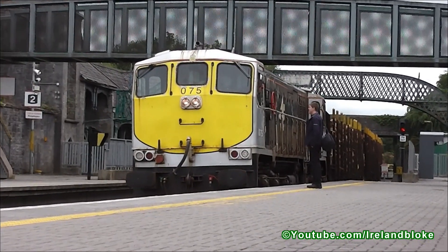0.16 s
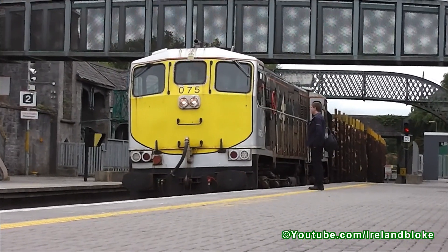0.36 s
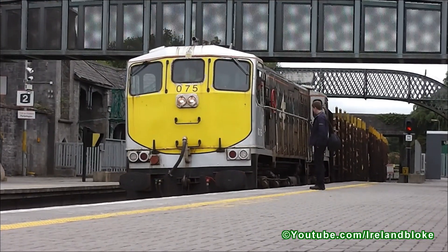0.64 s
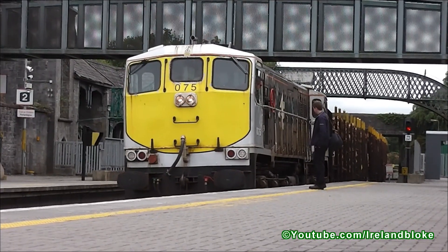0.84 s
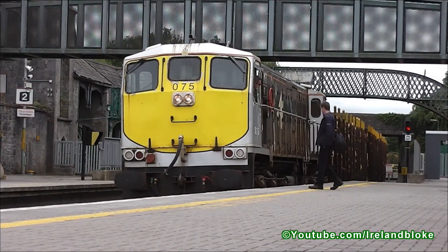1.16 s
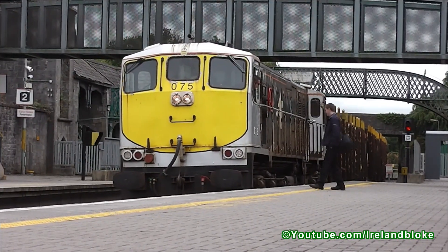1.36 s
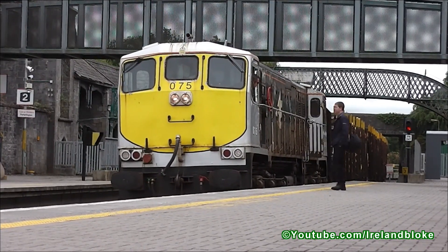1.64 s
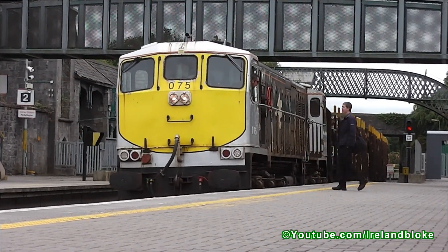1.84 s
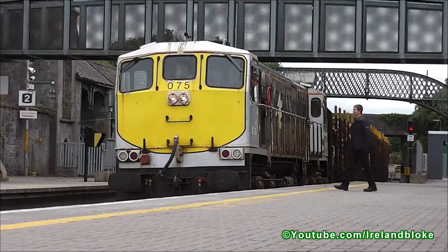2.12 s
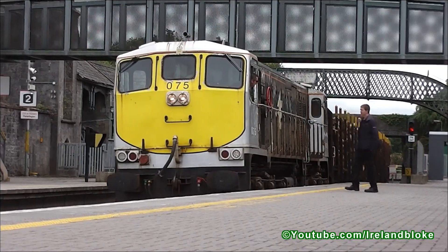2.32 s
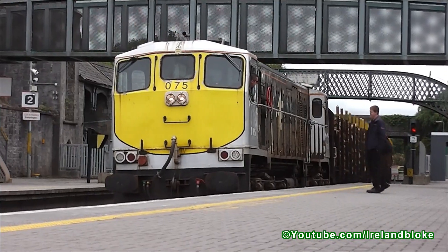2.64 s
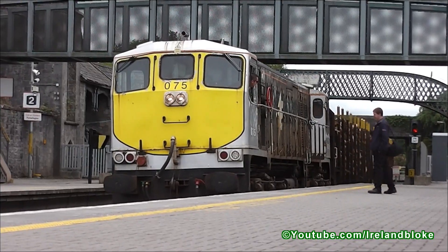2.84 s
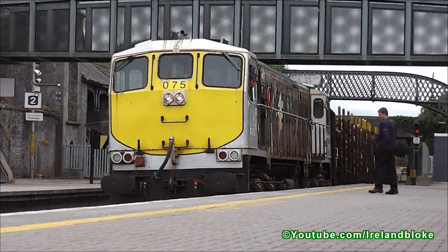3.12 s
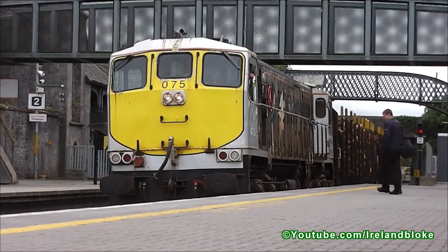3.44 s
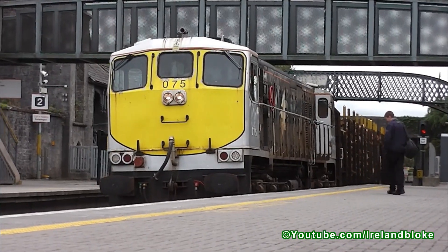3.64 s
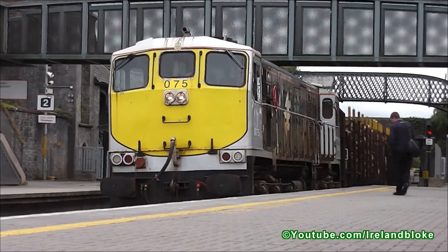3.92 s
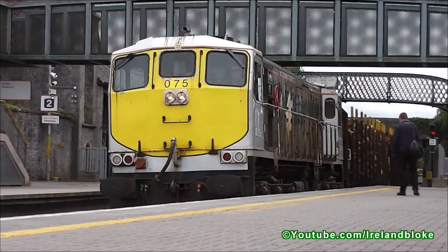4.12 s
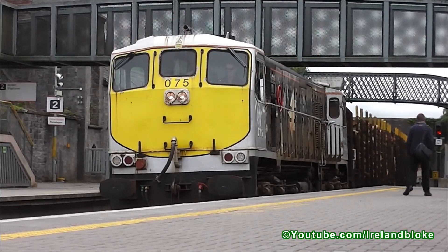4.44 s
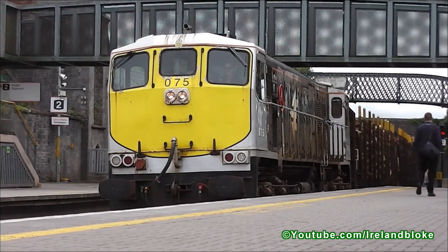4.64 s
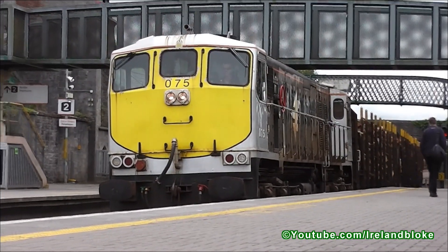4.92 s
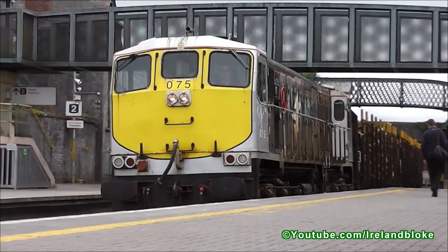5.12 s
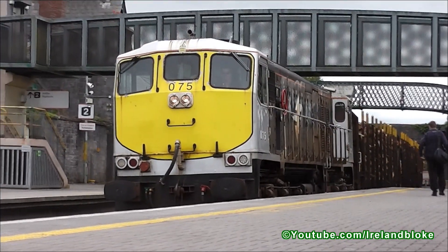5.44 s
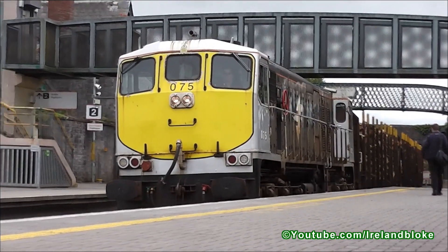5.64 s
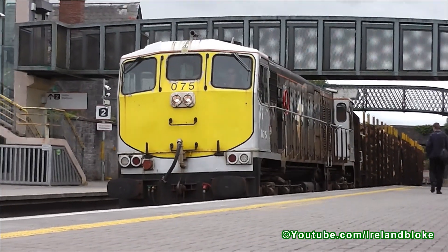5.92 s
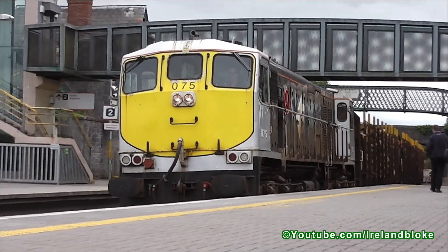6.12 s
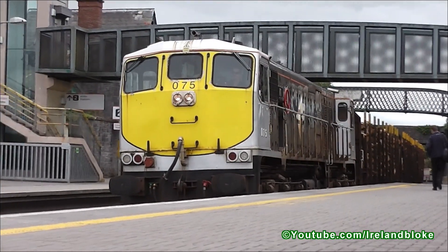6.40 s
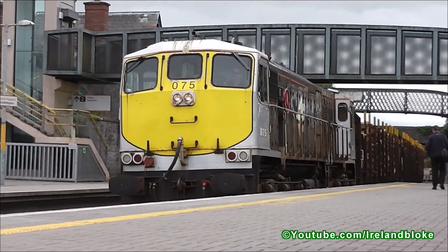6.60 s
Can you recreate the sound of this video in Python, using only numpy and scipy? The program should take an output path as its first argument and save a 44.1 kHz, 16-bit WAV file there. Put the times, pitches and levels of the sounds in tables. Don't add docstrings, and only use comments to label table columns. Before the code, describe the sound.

A big diesel locomotive throbs loudly in uneven deep beats close by, with gear whine, airy fan hiss and a faint late wheel squeal.

```python
import sys
import numpy as np
from scipy import signal
from scipy.fft import rfft, irfft, next_fast_len
from scipy.io import wavfile
from scipy.ndimage import uniform_filter1d, map_coordinates

SR = 44100
rng = np.random.default_rng(int(sys.argv[2]) if len(sys.argv) > 2 else 0)


def voltage_ratio(level):
    return 10 ** (np.asarray(level, float) / 20)


def digitize_waveform(pressure):
    field = np.atleast_2d(pressure).T
    bounded = np.clip(field, -1, 1)
    quanta = np.round(bounded * 32767).astype(np.int16)
    wavfile.write(sys.argv[1], SR, quanta)


N = 298557

SHAFT_HZ = 9.535
GEAR_HZ, PUMP_HZ = 753.3, 1076.5
OVERTONES_FADE_DB_PER_S = 0.9
TURBO_DB = -4
HOLLOW_FOLLOWS = 1
NULL_S, NULL_ORDER, RETURN_DB, RETURN_RAD = 6.03, 9, 7, -1.3
DRIVE_DB, CEILING_DB, RELEASE_DB_PER_S, ATTACK_S = 2.5, -2.03, 49, 0.002
TALL_SHARE, TICK_DB = 0.83, -29.5

# [crank angle/deg, level/dB]
FIRINGS = [(-4.8, 3.0), (26.5, 7.0), (50.0, 1.0), (113.7, 3.4), (124.0, -14.2), (140.7, -8.6),
           (188.1, -7.1), (224.4, -6.7), (232.0, 0.5), (282.7, 6.5), (303.2, 10.6), (320.9, 4.7)]
# [t/s, delay/ms]
BEAT_DELAY = [(0, 0.52), (1.4, 1.45), (2.8, 0.23), (4.2, -0.34), (5.4, -0.02), (6.2, -0.97), (6.77, -1.92)]
# [f/Hz, level/dB]
STACK_RESPONSE = [(25, -45.5), (42, -59.4), (57, -30.0), (75, -18.6), (90, -32.1), (105, -31.0),
                  (125, -32.7), (140, -46.5), (160, -55.6), (190, -75.9), (225, -35.5), (255, -41.1),
                  (285, -50.6), (320, -39.7)]
# [order, level/dB, echo share, spacing of cancellings t/s, one cancelling t/s]
WALL_ECHOES = [(5, -2.4, 0.64, 5.2, 3.12), (6, -4.8, 0.92, 8.3, -0.99), (7, -2.0, 0.45, 3.3, -0.55),
               (8, -6.9, 1.2, 9.3, -0.67), (9, -6.2, 1.2, 8.6, -1.24), (10, -3.9, 0.44, 2.5, 0.85),
               (11, -1.1, 0.58, 8.4, 1.04), (12, 1.7, 0.42, 16.0, 2.95), (13, -0.9, 0.19, 6.9, 1.85),
               (14, -0.7, 0.18, 16.0, 4.8), (15, 0.5, 0.25, 8.8, 0.85)]
# [f/Hz, level/dB]
CASING_RESPONSE = [(150, -52), (175, -34), (200, -54), (250, -62.5), (290, -38.5), (320, -72), (345, -49),
                   (400, -33), (460, -36), (510, -42.5), (555, -35), (640, -99)]
# [t/s, cam gear level/dB, pump gear level/dB]
MESH_LEVELS = [(0, -52, -36), (.4, -18.5, -32), (1, -35, -32), (1.35, -24.5, -30.5), (1.7, -29, -34.5),
               (2.1, -26, -31.5), (2.6, -25, -37), (3.1, -29, -36), (3.55, -27, -41), (3.9, -23, -31),
               (4.2, -21.5, -29.5), (4.6, -20, -36), (5, -20.5, -29.5), (5.5, -23, -35.5), (6, -24, -31),
               (6.77, -23, -31)]
# [multiple, level/dB]
CAM_GEAR_MULTIPLES = [(.5, -36), (1.5, -40), (2.0, -40), (2.5, -50), (5.0, -56)]
# [t/s, lower ring level/dB, upper ring level/dB]
BRAKE_RINGS = [(0, -64, -62), (.5, -62, -48), (1.05, -60, -57), (1.4, -68, -47.5), (2.3, -67, -52),
               (2.9, -64, -58), (3.2, -57, -52), (3.8, -53, -54), (4.5, -54, -63), (4.9, -52, -52),
               (5.3, -51, -57), (6.77, -52, -60)]
# [t/s, peak level/dB, length t/s]
WHEEL_SLIPS = [(5.983, -38, .035), (6.03, -41, 0.029), (6.054, -32, 0.062), (6.102, -34, 0.043),
               (6.14, -32, 0.029), (6.18, -34, .033), (6.226, -34, 0.026), (6.27, -43, .035),
               (6.297, -33, .04), (6.363, -37, .035), (6.4, -31, 0.033), (6.432, -35, 0.028),
               (6.464, -37, 0.026), (6.492, -34, 0.02), (6.527, -43, 0.025), (6.569, -48, .04),
               (6.61, -39, 0.04), (6.66, -40, 0.032), (6.734, -44, .03)]
# [t/s, hiss level/dB, block level/dB]
ROAR_LEVELS = [(0, -33, -11), (.6, -32, -12), (1.6, -33.5, -12.5), (2.3, -33, -11), (2.9, -36.5, -14),
               (3.8, -35.5, -15.5), (4.8, -33.5, -14), (5.3, -34, -14), (6, -36, -16), (6.77, -37, -16.5)]
# [f/Hz, spectral level/dB per Hz]
BLOCK_SPECTRUM = [(18, -60), (40, -18), (97, -3.5), (137, -14), (177, -13), (255, -12.5), (327, -28.5),
                  (454, -13), (667, -12.5), (780, -8.5), (990, -18.5), (1530, -20), (3000, -44.5),
                  (6000, -130)]
# [f/Hz, spectral level/dB per Hz]
HISS_SPECTRUM = [(1060, -42), (1800, -3), (2300, -4), (2700, -13.5), (3100, -10), (4310, -8.5), (4890, -8),
                 (7200, -9.5), (8020, -6.5), (8700, -16), (10000, -16.5), (12000, -23.5), (13800, -30.5),
                 (15600, -35)]
# [f/Hz, width f/Hz, level/dB]
CAVITIES = [(245.5, 70, -25), (459, 26.2, -24.5), (804, 65, -36.5), (1612, 204, -39.5)]
# [f/Hz, coherence]
COHERENCE = [(60, 0.57), (130, 0.96), (290, 1), (640, 0.97), (1410, 0.82), (3100, 0.88), (6820, 0.62),
             (15000, 0.22)]
# [f/Hz, level/dB]
PORT_LEVEL = [(60, 0.5), (130, 1), (290, 0), (640, .5), (1410, 1), (3100, 0), (6820, -4.5), (15000, 0)]
# [f/Hz, phase/rad]
PORT_PHASE = [(0, 0.52), (3270, -0.23), (4130, -0.89), (4480, -0.24), (5340, 0.6), (6720, 0.3),
              (7240, -0.16), (8180, 0.88), (8790, 0.38), (12700, 0.6), (15200, -0.1)]
# [t/s, gain taken level/dB]
TALL_BEATS = [(0.0, 0), (0.2198, 6), (0.3214, 9), (0.6398, 6), (1.056, 7.5), (1.369, 7.5), (1.5837, 2),
              (1.6866, 5.9), (1.897, 9), (2.108, 7.5), (2.2129, 8), (2.3174, 10), (2.4232, 8.5),
              (2.631, 5.5), (2.7366, 6.5), (2.9459, 6.5), (3.2552, 6.0), (3.4706, 5), (3.7568, 3),
              (3.8109, 5.5), (4.281, 6), (4.9072, 8), (5.1641, 3), (5.4589, 6.5), (5.6835, 6.5),
              (5.7824, 6.0), (5.8946, 5.5), (6.2087, 5.5), (6.3593, 2), (6.4352, 4.5)]


def crank_angle():
    arrival_s = np.arange(N) / SR - curves(BEAT_DELAY)[0] / 1000
    return 2 * np.pi * SHAFT_HZ * arrival_s


def exhaust():
    angle = crank_angle()
    return voltage_ratio(1.93) * (stack_orders(angle) + casing_orders(angle))


def stack_orders(angle):
    t, out = np.arange(N) / SR, np.zeros(N)
    deg, strength_db = np.transpose(FIRINGS)
    echoes = {row[0]: row[1:] for row in WALL_ECHOES}
    for k in range(3, 31):
        firing_sum = np.sum(voltage_ratio(strength_db) * np.exp(-1j * k * np.radians(deg)))
        puff = firing_sum * causal(STACK_RESPONSE, k * SHAFT_HZ)
        db, share, every_s, at_s = echoes.get(k, (0, 0, 1, 0))
        path = voltage_ratio(db) * (1 - share * np.exp(-2j * np.pi * (t - at_s) / every_s))
        if k == NULL_ORDER:
            returned = voltage_ratio(RETURN_DB) * np.exp(1j * RETURN_RAD)
            path = path * np.tanh((NULL_S - t) * 4) * np.where(t > NULL_S, returned, 1)
        unsteady_db = 0.05 * k * wobble(4)
        out += voltage_ratio(unsteady_db + 0.0033 * k) * (puff * path * np.exp(1j * k * angle)).real
    return out


def casing_orders(angle):
    out = np.zeros(N)
    for k in range(16, 64):
        level_db = along(CASING_RESPONSE, k * SHAFT_HZ) + rng.normal(0, 2.86) + 2.8 * wobble(2.68)
        phase = rng.uniform(0, 2 * np.pi) + 0.16 * wobble(2.844)
        out += voltage_ratio(level_db - 3.5) * np.cos(k * angle + phase)
    return out


def gears():
    t = np.arange(N) / SR
    cam_db, pump_db = curves(MESH_LEVELS)
    cam = mesh_tones(t, GEAR_HZ, cam_db, CAM_GEAR_MULTIPLES)
    pump = mesh_tones(t, PUMP_HZ, pump_db, [(1.8, -52)])
    return cam + pump


def mesh_tones(t, hz, db, multiples):
    turn = 2 * np.pi * hz * t + 1.21 * wobble(3)
    flutter_db = 2.1 * wobble(18) + 1.1 * wobble(7)
    out = voltage_ratio(db + 3.0 + flutter_db) * np.sin(turn + 0.79 * wobble(12))
    for k, level_db in multiples:
        sink_db = OVERTONES_FADE_DB_PER_S * t - 2.7 * wobble(22)
        tone_db = level_db + 6.0 - sink_db + 2.5 * wobble(5)
        out += voltage_ratio(tone_db) * np.sin(k * turn + 0.52 * wobble(8))
    return out


def turbocharger():
    whistle = rush(lambda f: peak(8000, 300)(f) ** 3, patchy_db=0.3)
    level_db = curves(ROAR_LEVELS)[0] + TURBO_DB
    return voltage_ratio(level_db + 1.85 * wobble(60) + 0.23 * wobble(3.06)) * whistle


def brakes():
    lower_db, upper_db = curves(BRAKE_RINGS)
    lower = ring(4813, lower_db, waver=2.0, flutter_db=3.2)
    return lower + ring(4973, upper_db, waver=0.89, flutter_db=5.0)


def wheel_squeal():
    t, slips = np.arange(N) / SR, np.zeros(N)
    for s, db, length in WHEEL_SLIPS:
        slips += voltage_ratio(db) * np.exp(-((t - s) / length * 2 - 1) ** 2 * 1.7)
    return slips * ring(3867, -8.5, waver=1.0, flutter_db=-0.8)


def ring(hz, db, waver, flutter_db):
    turn = 2 * np.pi * hz * np.arange(N) / SR + waver * wobble(45)
    port_phase = 0.24 * np.array([wobble(1.96), wobble(6)])
    return voltage_ratio(db + 7.5 + flutter_db * wobble(35)) * np.sin(turn + port_phase)


def roar():
    hiss_db, block_db = curves(ROAR_LEVELS)
    swing_db = HOLLOW_FOLLOWS * (block_db - block_db.mean())
    angle = crank_angle()
    puffs_db = 0.27 * np.cos(angle + 0.28) + 0.24 * np.cos(3 * angle + 0.35)
    shared_db = 0.16 * wobble(20)
    block_noise = rush(lambda f: voltage_ratio(along(BLOCK_SPECTRUM, f)), patchy_db=1.5)
    block = voltage_ratio(block_db - 7.5 + puffs_db + shared_db) * block_noise
    for hz, width_hz, db in CAVITIES:
        flutter_db = 0.7 * wobble(3.2)
        resonance = peak(hz, 1.5 * width_hz)
        cavity = rush(lambda f: resonance(f) ** 2, patchy_db=3.0)
        block += voltage_ratio(db + swing_db + flutter_db + 1.2 * puffs_db) * cavity
    hiss_noise = rush(lambda f: voltage_ratio(along(HISS_SPECTRUM, f)), patchy_db=0.55)
    hiss = voltage_ratio(hiss_db - 1.0 + shared_db + puffs_db) * hiss_noise
    return block + hiss


def rush(shape, patchy_db):
    z = signal.stft(rng.standard_normal((2, N + 512)), nperseg=512)[2]
    field = uniform_filter1d(rng.standard_normal(z.shape[1:]), size=6, axis=0)
    field = uniform_filter1d(field, size=10, axis=1)
    pair = signal.istft(z * voltage_ratio(patchy_db * unit(field)), nperseg=512)[1][:, :N]

    def mid_side(hz):
        turn = np.arccos(np.clip(along(COHERENCE, hz), 0, 1)) / 2
        return shape(hz) * np.array([np.cos(turn), np.sin(turn)])

    mid, side = filtered(pair, mid_side)
    return unit(np.array([mid + side, mid - side]))


def peak(hz, width_hz):
    return lambda f: 1j * f * width_hz / (hz * hz - f * f + 1j * f * width_hz)


def causal(points, hz):
    grid = np.fft.rfftfreq(SR, 1 / SR)
    cep = irfft(np.log(voltage_ratio(along(points, grid))))
    cep[1:SR // 2] *= 2
    cep[SR // 2 + 1:] = 0
    log_gain = rfft(cep)
    return np.exp(np.interp(hz, grid, log_gain.real) + 1j * np.interp(hz, grid, log_gain.imag))


def filtered(x, response):
    m = next_fast_len(N + SR // 2)
    return irfft(rfft(x, m) * response(np.fft.rfftfreq(m, 1 / SR)), m)[..., :N]


def wobble(rate):
    knots = rng.standard_normal(int(N * rate / SR) + 4)
    return map_coordinates(knots, [np.arange(N) * rate / SR], order=1)


def curves(rows):
    s, *cols = np.transpose(rows)
    return [np.interp(np.arange(N) / SR, s, c) for c in cols]


def along(points, hz):
    f, v = np.transpose(points)
    return np.interp(np.log(hz + 1), np.log(f + 1), v)


def unit(x):
    return x / np.sqrt(np.mean(x ** 2) + 1e-20)


def scene():
    return exhaust() + gears() + turbocharger() + brakes() + wheel_squeal() + roar()


def top_cut(x):
    return signal.sosfilt(signal.butter(12, 15630, fs=SR, output="sos"), x)


def record(dry):
    def ports(f):
        left = voltage_ratio(along(PORT_LEVEL, f) / 2) * np.exp(0.5j * along(PORT_PHASE, f))
        return np.array([left, 1 / left]) / (1 + (33 / (f + 1)) ** 6)

    x = voltage_ratio(DRIVE_DB) * filtered(dry, ports)
    climb_db = RELEASE_DB_PER_S * np.arange(N) / SR
    over_db = np.maximum(20 * np.log10(np.abs(x).max(0) + 1e-9) - CEILING_DB, 0)
    s, taken_db = np.transpose(TALL_BEATS)
    beat = (s * SR).astype(int)
    over_db[beat] = TALL_SHARE * taken_db
    duck_db = np.maximum.accumulate(over_db + climb_db) - climb_db
    luck = rng.standard_normal((len(s), 2))
    ticks = np.bincount(beat, voltage_ratio(TICK_DB + 2.5 * luck[:, 0]) * np.sign(luck[:, 1]), N)
    keep = np.exp(-1 / (ATTACK_S * SR))
    eased_db = signal.lfilter([1 - keep], [1, -keep], duck_db)
    mix = np.clip(x * voltage_ratio(-eased_db) + ticks, -0.985, 0.985)
    return top_cut(mix)


dry = scene()
out = record(dry)
digitize_waveform(out)
```